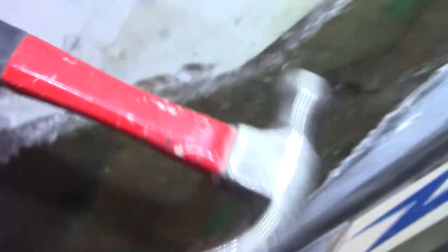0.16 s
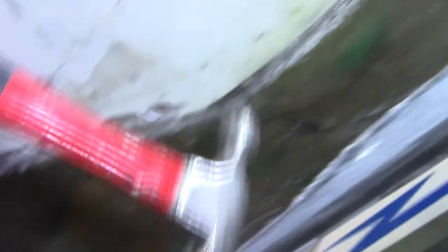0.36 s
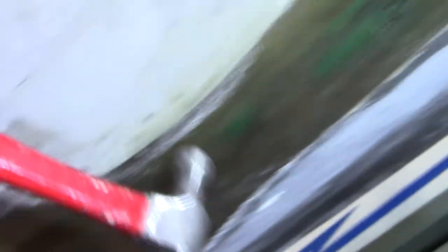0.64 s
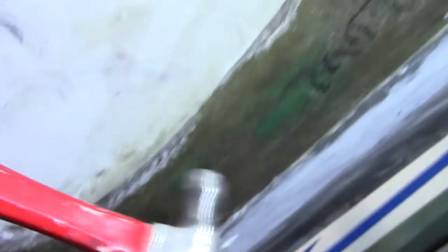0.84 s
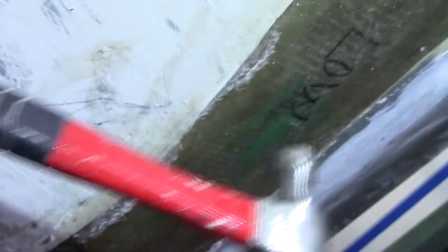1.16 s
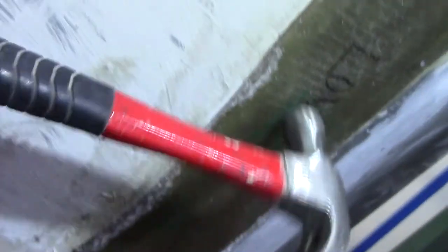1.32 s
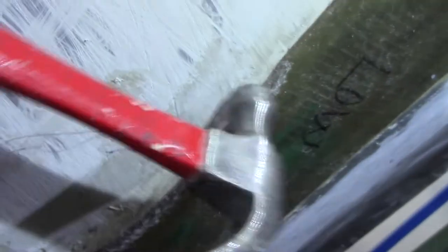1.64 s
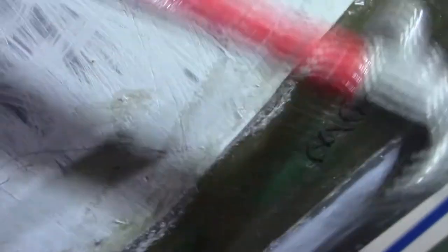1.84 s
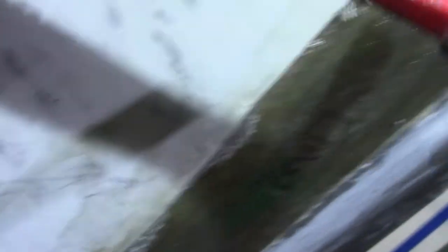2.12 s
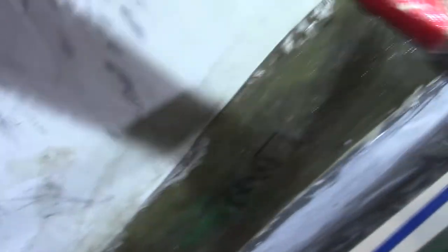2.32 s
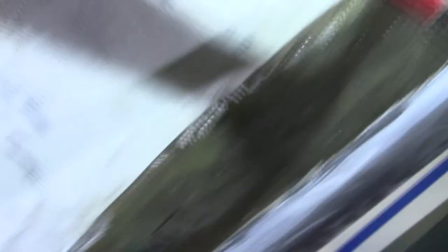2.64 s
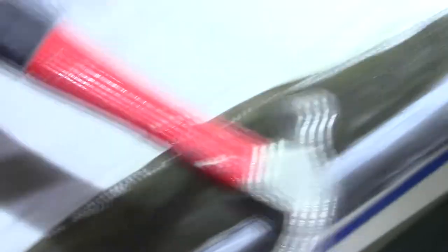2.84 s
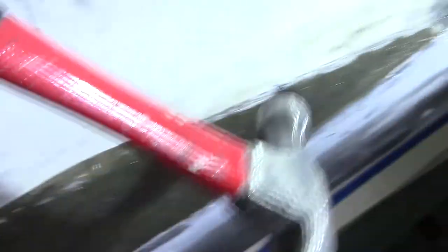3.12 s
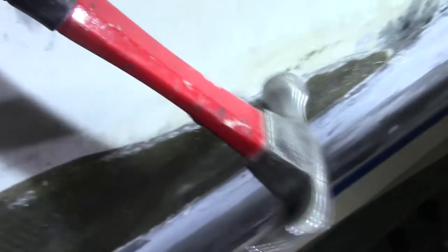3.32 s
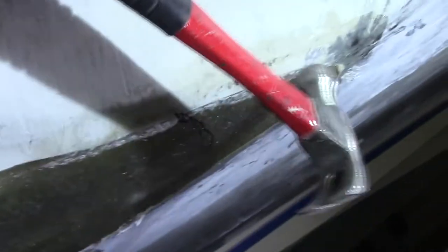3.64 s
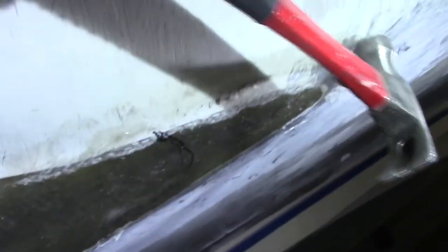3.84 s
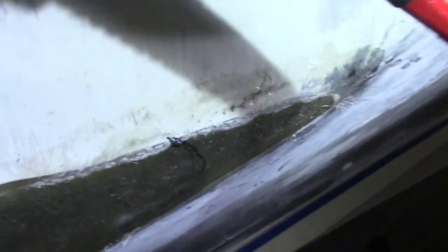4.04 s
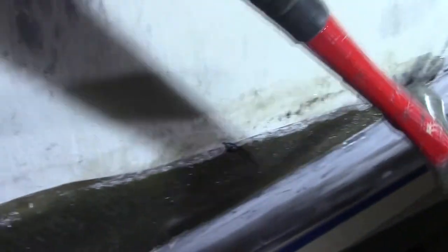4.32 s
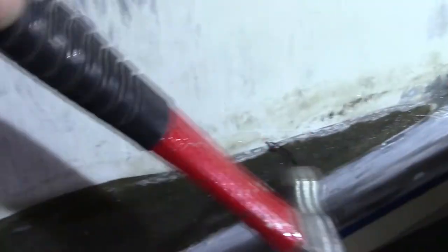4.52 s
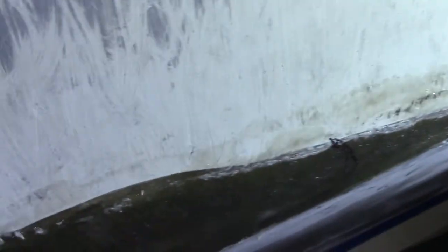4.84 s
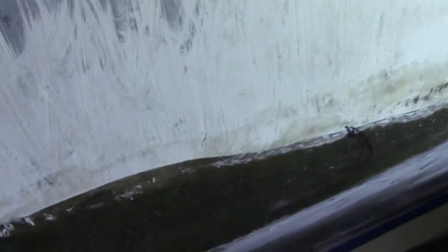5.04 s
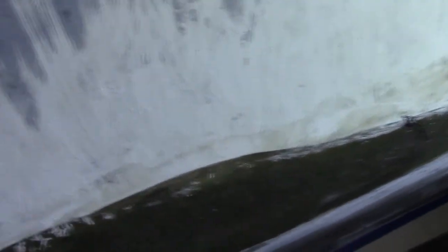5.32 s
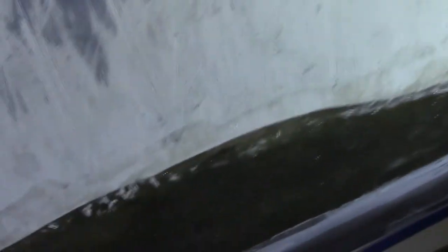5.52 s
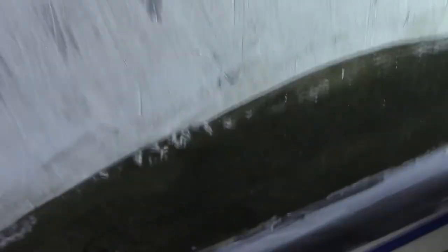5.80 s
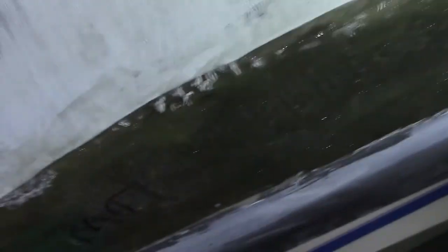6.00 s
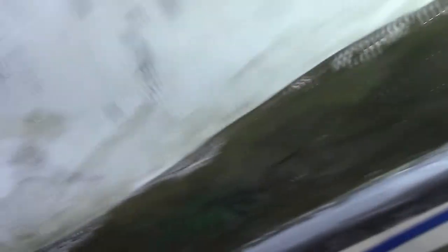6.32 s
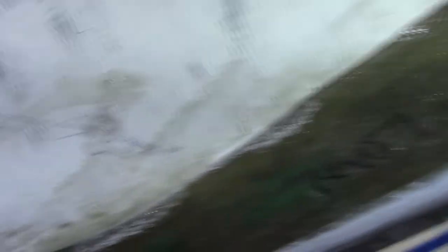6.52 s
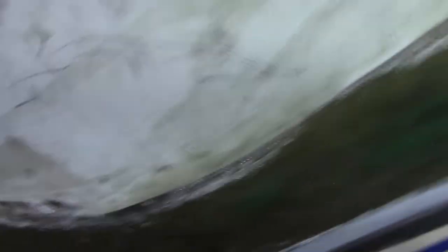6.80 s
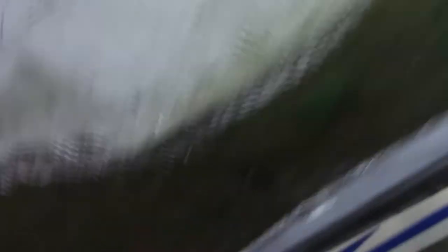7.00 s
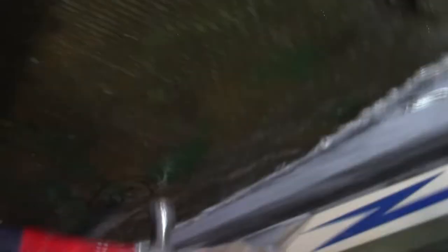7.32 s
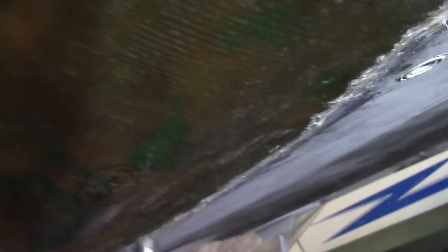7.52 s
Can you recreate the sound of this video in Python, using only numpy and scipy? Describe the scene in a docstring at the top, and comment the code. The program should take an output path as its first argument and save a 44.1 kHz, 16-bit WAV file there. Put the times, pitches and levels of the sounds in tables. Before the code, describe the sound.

A steel hammer taps along a fiberglass boat hull, close to the microphone. The hard, hollow knocks come about three a second, each with a slightly different pitch and a short ring from the shell. Two taps near the middle are softer. Near the end the tapping pauses briefly, leaving a few faint dry ticks, then two more knocks land. The quiet workshop echoes after each blow.

```python
"""Hard, hollow knocks, about three a second: a steel hammer taps along a fiberglass boat hull, close by.
Each blow sets the struck panel and the whole shell ringing, every spot with its own pitch and colour,
and the workshop echoes on after it. Underneath lie still air and the faint buzz of a lamp ballast.
A light rustle and small dry ticks come in between the later taps; the loudest peaks are squeezed."""
import sys
import numpy as np
from scipy import signal
from scipy.fft import rfft, irfft, next_fast_len
from scipy.io import wavfile
from scipy.ndimage import uniform_filter1d

SR = 44100
rng = np.random.default_rng(int(sys.argv[2]) if len(sys.argv) > 2 else 0)


def dump_mix(stems):
    """Bounce the given channels to the path in sys.argv[1] as a 16-bit WAV at rate SR."""
    frames = np.atleast_2d(stems).T  # one column per channel
    limited = np.clip(frames, -1, 1)  # hard clip at full scale
    pcm = np.round(limited * 32767).astype(np.int16)
    wavfile.write(sys.argv[1], SR, pcm)


N = 337806

# Hammer taps; the first lands just before the start. Each row: start in seconds, the panel's share of
# the knock in dB, its pitch in Hz, its t60 in seconds, knock in dB, edge where the knock dulls in Hz,
# then thud, clack, hammer-head ring, low shell ring and hollow ring, all in dB.
TAPS = [(-0.14, 17, 815, .05, -18.5, 1370, -28.5, -91, -90, -47, -55.5),
        (0.312, 9.5, 945, 0.035, -23.5, 1210, -27, -92.5, -99, -44, -72),
        (0.688, 14, 765, 0.012, -16.5, 900, -20.5, -76.5, -84, -41, -50.5),
        (1.022, 11.5, 790, 0.015, -18.5, 1560, -20.5, -79, -99, -44, -46),
        (1.316, 11.5, 701, 0.045, -11, 1960, -17.5, -66.5, -70.5, -51.5, -42),
        (1.625, 9, 710, 0.025, -13, 2530, -17, -69.5, -75, -43, -42.5),
        (1.917, 21, 778, 0.031, -11.5, 1150, -18, -64.5, -70, -49.5, -46),
        (2.207, 22, 787, 0.044, -13, 1400, -18, -68, -67, -51.5, -40.5),
        (2.576, 8, 780, 0.045, -16.5, 680, -17.5, -73.5, -73, -48.5, -50),
        (2.919, 5, 761, 0.095, -12.5, 1060, -13, -54.5, -56.5, -38, -43.5),
        (3.263, 9.5, 740, 0.038, -16.5, 864, -13.5, -44.5, -77, -39, -43.5),
        (3.617, 1, 560, 0.017, -35.5, 4990, -20, -61, -88, -47, -67),
        (3.828, 4.5, 587, .04, -23, 967, -17, -57.5, -90.5, -46, -67),
        (4.222, 11, 740, .013, -13, 900, -13, -50, -79, -42.5, -43.5),
        (4.591, 9.5, 746, 0.046, -11.5, 1870, -14.5, -59, -68.5, -43, -43.5),
        (4.876, 12.5, 750, 0.061, -11, 1775, -18, -63.5, -72, -37.5, -43.5),
        (5.199, 15.5, 753, 0.028, -12.5, 1830, -18.5, -68, -63.5, -46, -42),
        (5.505, 11, 786, 0.05, -14.5, 2170, -17.5, -71, -94, -48.5, -43.5),
        (5.847, 11.5, 930, 0.031, -11, 1760, -16, -63, -68.5, -46.5, -42),
        (6.177, 12, 1088, 0.026, -11.5, 2460, -22.5, -71, -89.5, -52, -46.5),
        (6.517, 10.5, 1150, 0.029, -13.5, 1930, -21.5, -69, -75.5, -58, -63.5),
        (7.359, 8, 655, 0.056, -11.5, 1560, -19.5, -67, -63, -59, -51),
        (7.648, 11, 676, .022, -9, 1170, -24, -64, -69, -43, -49.5)]
# Modes of the hull shell. Each row: pitch in Hz, relative level in dB, t60 in seconds.
HULL_MODES = [(112.8, -1, 0.3), (149, -3.5, .25), (200, -0.5, 0.022), (212.1, 4.5, 0.14),
              (267.1, -2.5, 0.21), (304, -7, 0.38), (333.2, -5, 0.13), (388.1, -2, 0.22), (451.4, -7, 0.12),
              (485, 0, .15), (538, -4, 0.17), (604, -2.5, .14), (623, -9.5, 0.047), (720, -9.5, 0.06),
              (738, -5.5, 0.068), (834, -14.5, 0.097), (887, 0, 0.089), (984.6, 4, 0.077),
              (1046.5, 0, 0.073), (1144, -11, 0.15), (1300, -4.5, 0.087), (1570, -8, 0.011),
              (2190, -7, 0.036), (2750, -3.5, 0.0061), (3430, -9, 0.016), (3700, -3.5, 0.012),
              (4370, -8, 0.009), (5230, 1.5, 0.017), (6140, -4, 0.019), (6550, -12.5, 0.011),
              (7660, -9, .02)]
# Dense modes, heard as a crack of noise. Each row: frequency in Hz, t60 in seconds.
CRACK_DECAY = [(150, 0.26), (400, 0.36), (1000, 0.27), (2000, 0.17), (4000, 0.14), (8000, 0.032),
               (14000, 0.054)]
# The three parts of a tap's colour. Each row: frequency in Hz, relative level in dB.
KNOCK_SPECTRUM = [(170, -17), (330, -16.5), (520, -4), (800, 0), (1200, -4.5), (1800, -12), (7000, -29)]
THUD_SPECTRUM = [(170, -3), (330, -0.5), (520, -5), (800, -21), (1200, -30.5), (7000, -77.5)]
CLACK_SPECTRUM = [(1800, 4.4), (3500, 6.1), (7000, 0.28)]
# Points of the EQ that colours a tap. Each entry: frequency in Hz.
COLOUR_HZ = np.array([30, 70, 170, 330, 520, 800, 1200, 1800, 3500, 7000, 16000])
# Modes that outlast the knock. Each row: pitch in Hz, relative level in dB, t60 in seconds,
# which ring level of the tap drives it (0 hammer head, 1 low shell, 2 hollow).
RING_MODES = [(6450, 0, .3, 0), (195, 8, .5, 1), (326, -1, 2.0, 2), (152, -6, 1.5, 2)]
# Workshop echo. Each row: frequency in Hz, t60 in seconds, relative level in dB, left-right likeness.
SHOP_ECHO = [(80, 2.3, 6.5, 1), (189.7, 0.71, 5.5, 1), (460, 1.44, 2, 1), (920, 1.2, -6, 0.99),
             (1880, 1.37, -6, 0.96), (3950, 0.42, 1, 0.9), (8200, 0.18, 11.5, .9), (13820, 0.63, -8, .9)]
# Still air of the shop. Each row: frequency in Hz, relative level in dB.
AIR_SPECTRUM = [(30, -29.5), (100, -3), (185, -8), (360, -3.5), (800, -11), (2000, -22), (4000, -27.5),
                (8000, -37), (14000, -53.5)]
# Partials of the lamp ballast. Each row: harmonic number, relative level in dB.
BUZZ_HARMONICS = [(6, 2.5), (19, -2.5), (22, -6.5), (23, -10), (25, -4.5), (26, -4), (28, -3.5), (30, -8),
                  (31, -3.5), (32, 0.5), (33, -3), (34, -8), (35, -4), (36, -4), (37, -5.5), (38, -6),
                  (39, -8.5), (41, -10), (45, -12), (50, -6), (55, -15)]
# The buzz swells and fades. Each row: time in seconds, gain in dB.
BUZZ_FADER = [(0, -84), (1, -75), (2, -84), (3.2, -74), (4.6, -66), (5.2, -79.5), (6.5, -76.5),
              (7.66, -74.5)]
# The rustle creeps in. Each row: time in seconds, level in dB.
RUSTLE_FADER = [(0, -101), (3.301, -87.5), (4.2, -82), (5, -86), (6.4, -88), (6.95, -79), (7.1, -83),
                (7.66, -89)]
# Small dry ticks. Each row: start in seconds, peak level in dB, centre in Hz.
TICKS = [(4.123, -52, 9770), (4.373, -49, 3620), (4.438, -55, 4050), (4.8444, -51, 3960),
         (5.38, -61.5, 10600), (6.6643, -64, 10300), (6.762, -59.5, 3660), (6.8955, -60.5, 6500),
         (6.9463, -47.5, 3970), (6.9594, -42, 9100), (6.969, -50, 6960), (7.002, -44, 4040),
         (7.0217, -50, 3870), (7.031, -47, 6700)]

LEAD = SR // 2  # samples of pre-roll for the first tap
# A clack stronger than SOFT_CLACK_DB beside the knock lifts the hull modes above UPPER_HZ.
SOFT_CLACK_DB, LIFT_PER_DB, UPPER_HZ = -53, 0.62, 1500
DULL_STEEPNESS = 4.04  # the knock's power falls as this power of frequency above its edge
SHOP_SEND_DB, AIR_DB = -19.5, -70
BUZZ_HZ, HUM_DB = 119.95, -71.5
TICK_T60_S, TOP_HZ = 0.12, 16100
SIDE = np.array([[1], [-1]])  # adds to the left, takes from the right


def gain_of(db):
    """Decibels to a factor."""
    return 10 ** (np.asarray(db) / 20)


def read(table, hz, column=1):
    """One column of a table, interpolated on a log-frequency axis."""
    table = np.array(table)
    return np.interp(np.log(hz + 1), np.log(table[:, 0] + 1), table[:, column])


def band(x, edges_hz):
    """Gentle band-pass."""
    return signal.lfilter(*signal.butter(2, edges_hz, "bandpass", fs=SR), x)


def add(mix, start_s, sound):
    """Lays a sound into a track that has pre-roll."""
    part = mix[..., LEAD + round(start_s * SR):][..., :sound.shape[-1]]
    part += sound[..., :part.shape[-1]]


def dying_noise(t60, db, count, size):
    """Spectrograms of two unrelated noises in which every frequency dies at its own speed."""
    hz, t, frames = signal.stft(rng.standard_normal((2, count)), SR, nperseg=size)
    return hz, frames * gain_of(db(hz)[:, None] - 60 * t / t60(hz)[:, None])


def spot_colour(knock_db, edge_hz, thud_db, clack_db):
    """A spot's spectrum in dB: knock, thud and clack add in power; a softer spot dulls lower down."""
    hz = COLOUR_HZ[2:-1]
    knock = gain_of(knock_db + read(KNOCK_SPECTRUM, hz)) ** 2 / (1 + (hz / edge_hz) ** DULL_STEEPNESS)
    thud = gain_of(thud_db + read(THUD_SPECTRUM, hz)) ** 2
    clack = gain_of(clack_db + read(CLACK_SPECTRUM, hz)) ** 2
    db = 10 * np.log10(knock + thud + clack)
    top_db = db[-1] - 13.5 + 0.12 * (db[-1] - db[-2])
    return np.r_[db[0] - 46, db[0] - 19, db, top_db]  # a thin shell has little deep bass


def coloured(x, colour_db):
    """A causal EQ bends the spectrum of x toward the given levels at COLOUR_HZ."""
    size = 2 ** 14
    log_hz = np.log(np.fft.rfftfreq(size, 1 / SR) + 1)
    bands = np.array([np.interp(log_hz, np.log(COLOUR_HZ + 1), one) for one in np.eye(len(COLOUR_HZ))])
    spectrum, eq_db = rfft(x, size), np.zeros(len(COLOUR_HZ))
    for _ in range(3):
        power = abs(spectrum.mean(0) * gain_of(eq_db @ bands)) ** 2 / SR
        eq_db += colour_db - 10 * np.log10(bands @ power / bands.sum(1))
    log_gain = np.log(gain_of(eq_db @ bands))
    # minimum phase keeps the attack sharp
    log_response = np.conj(signal.hilbert(np.r_[log_gain, log_gain[-2:0:-1]]))[:len(log_hz)]
    return irfft(spectrum * np.exp(log_response), size)[:, :x.shape[1]]


def hull_shell(t, lift_db):
    """The whole shell rings; where the blow lands sets how strongly and which way each mode moves."""
    hz, db, t60 = np.transpose(HULL_MODES)[..., None]
    strength, direction = rng.standard_normal((2, *hz.shape))
    share = np.sign(direction) * gain_of(db + 3.4 * strength + lift_db * (hz > UPPER_HZ))
    modes = share * gain_of(-60 * t / t60) * np.sin(2 * np.pi * hz * t)
    return modes.sum(0) * (1 - np.exp(-t / 0.00083))


def contact_crack(t):
    """The contact wakes modes so dense that they blur into a burst of noise."""
    _, frames = dying_noise(lambda f: read(CRACK_DECAY, f), np.zeros_like, len(t), size=128)
    noise = signal.istft(frames, SR, nperseg=128)[1][:, :len(t)]
    mid, side = noise * (1 + gain_of(13 - 60 * t / 0.023))  # the first milliseconds are the loudest
    return mid + gain_of(-19.5) * SIDE * side


def hammer_tap(panel_db, panel_hz, panel_t60, knock_db, edge_hz, thud_db, clack_db):
    """Steel strikes a panel and the shell follows. Returns the close knock and the bare blow."""
    t = np.arange(round(.3 * SR)) / SR
    panel = gain_of(panel_db - 60 * t / panel_t60) * np.sin(2 * np.pi * panel_hz * t)
    shell = hull_shell(t, lift_db=LIFT_PER_DB * max(clack_db - knock_db - SOFT_CLACK_DB, 0))
    crack = gain_of(4.5) * contact_crack(t)
    blow = signal.unit_impulse(len(t))[None]
    # the knock holds its height for some milliseconds, then steps down
    hold = 1 + 0.29 / (1 + np.exp(np.minimum((t - .009) / 0.0063, 50)))
    fade_out = np.minimum(t[::-1] * 20, 1)
    knock = ((shell + panel + crack) * hold + gain_of(26.5) * blow) * fade_out
    colour_db = spot_colour(knock_db, edge_hz, thud_db, clack_db)
    return coloured(knock, colour_db), coloured(blow, colour_db)[0]


def after_ring(*drive_db):
    """Hammer head and hull ring on in clean tones; the low ones take some milliseconds to swell."""
    t = np.arange(round(.8 * SR)) / SR
    ring = np.zeros(len(t))
    for hz, db, t60, driver in RING_MODES:
        envelope = gain_of(drive_db[int(driver)] + db - 60 * t / t60) * (1 - np.exp(-t * hz / 2))
        ring += envelope * np.sin(2 * np.pi * hz * t)
    return ring * np.minimum(t[::-1] * 10, 1)


def shop_echo(send):
    """The workshop answers with a dense tail, nearly alike left and right."""
    hz, (left, other) = dying_noise(lambda f: read(SHOP_ECHO, f), lambda f: read(SHOP_ECHO, f, column=2),
                                    count=SR * 3 // 2, size=512)
    likeness = np.clip(read(SHOP_ECHO, hz, column=3), 0, 1)[:, None]
    right = likeness * left + np.sqrt(1 - likeness ** 2) * other
    tail = signal.istft(np.array([left, right]), SR, nperseg=512)[1]
    tail *= 1 - np.exp(-np.arange(tail.shape[1]) / SR / 0.0025)  # echoes build up
    return signal.fftconvolve(send[None], tail / np.linalg.norm(tail[0]), axes=1)[:, :len(send)]


def still_air():
    """Room tone: a faint, dark, narrow bed of noise."""
    size = next_fast_len(N)
    colour = gain_of(read(AIR_SPECTRUM, np.fft.rfftfreq(size, 1 / SR)))
    mid, side = irfft(rfft(rng.standard_normal((2, size))) * colour, size)[:, :N]
    return gain_of(AIR_DB) * np.array([mid + 0.17 * side, mid - .2 * side]) / mid.std()


def ballast_buzz():
    """The lamp ballast buzzes in harmonics, each wavering on its own, over a steady hum."""
    t = np.arange(N) / SR
    harmonics, db = np.transpose(BUZZ_HARMONICS)
    waver_s = np.linspace(0, N / SR, 24)
    wavers = gain_of(db[:, None] + 4 * rng.standard_normal((len(db), len(waver_s))))
    buzz = np.zeros(N)
    for harmonic, waver in zip(harmonics, wavers):
        buzz += np.interp(t, waver_s, waver) * np.sin(2 * np.pi * (harmonic * BUZZ_HZ * t + rng.random()))
    fader_s, fader_db = np.transpose(BUZZ_FADER)
    hum = gain_of(HUM_DB) * np.sin(2 * np.pi * 3 * BUZZ_HZ * t)
    return np.interp(t, fader_s, gain_of(fader_db)) * buzz / np.sqrt(len(db)) + hum


def rustle(grains_per_s=1500):
    """A dry rustle of tiny uneven grains, all treble."""
    onsets = gain_of(3 * np.minimum(rng.exponential(1, N), 4)) * (rng.random(N) < grains_per_s / SR)
    t = np.arange(N) / SR
    envelope = signal.oaconvolve(onsets, gain_of(-60 * t[:600] / .012))[:N]
    grains = band(envelope * rng.standard_normal(N), [3500, 11000])
    return gain_of(np.interp(t, *np.transpose(RUSTLE_FADER))) * grains / grains.std()


def dry_tick(db, hz):
    """A snap with a short noisy tail, broad around its centre."""
    t = np.arange(3000) / SR
    mid, side = rng.standard_normal((2, len(t)))
    envelope = gain_of(-60 * t / 0.012) + gain_of(-11 - 60 * t / TICK_T60_S)
    snap = band((mid + 0.17 * SIDE * side) * envelope, [hz * .45, min(hz * 1.5, SR / 3)])
    peak = np.sqrt(2 * uniform_filter1d(snap ** 2, size=176).max() + 1e-20)  # the loudest 4 ms
    return gain_of(db) * snap / peak


def scene():
    """Taps and their echo up front; ticks, rustle, buzz and air behind."""
    mix, sends = np.zeros((2, N + LEAD)), np.zeros((3, N + LEAD))
    for k, (start_s, *spot, head_db, shell_db, hollow_db) in enumerate(TAPS):
        knock, blow = hammer_tap(*spot)
        add(mix, start_s, knock)
        add(mix, start_s, after_ring(head_db, shell_db, hollow_db))
        # neighbouring spots wake different echoes
        add(sends[k % len(sends)], start_s, gain_of(SHOP_SEND_DB) * blow)
    for start_s, db, hz in TICKS:
        add(mix, start_s, dry_tick(db, hz))
    mix += sum(shop_echo(send) for send in sends)
    return mix[:, LEAD:] * gain_of(-.15 * SIDE) + rustle() + ballast_buzz() + still_air()


def record(dry):
    """Soft overload on the loudest peaks, then a bass cut and a steep top cut."""
    ceiling, knee = .98, 3.5
    squeezed = dry / (1 + abs(dry / ceiling) ** knee) ** (1 / knee)
    bass_cut = signal.lfilter(*signal.butter(1, 45, "highpass", fs=SR), squeezed)
    top_cut = signal.firwin(255, TOP_HZ, window=("kaiser", 9), fs=SR)
    return signal.oaconvolve(bass_cut, top_cut[None], "same")


dry = scene()
out = record(dry)
dump_mix(out)
```